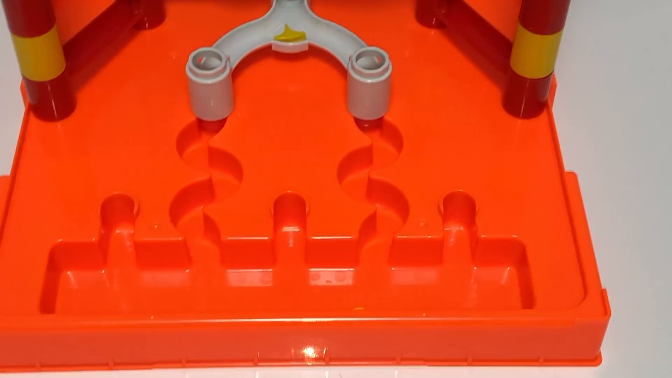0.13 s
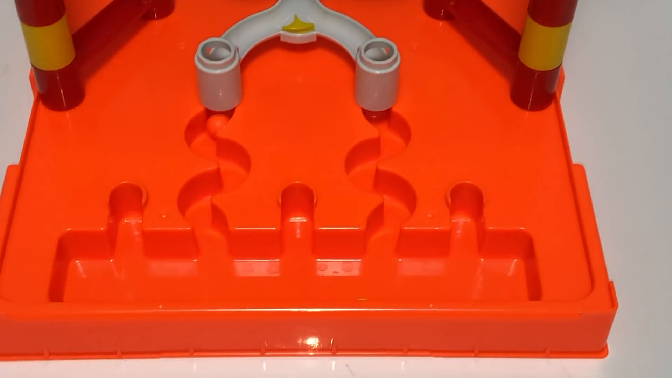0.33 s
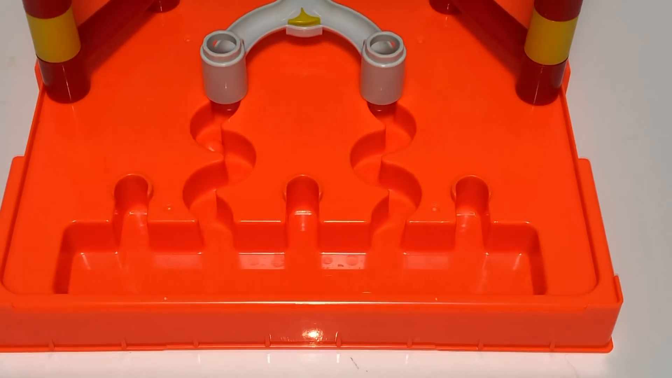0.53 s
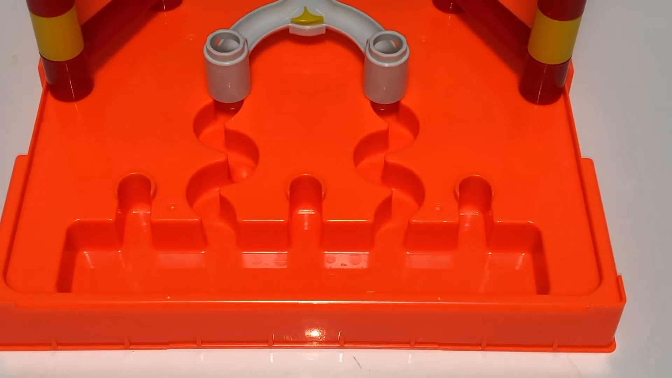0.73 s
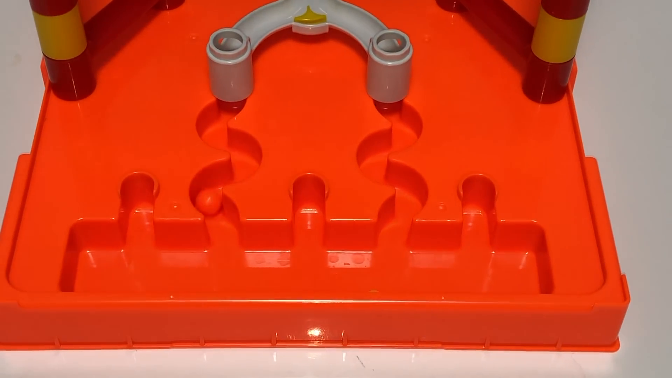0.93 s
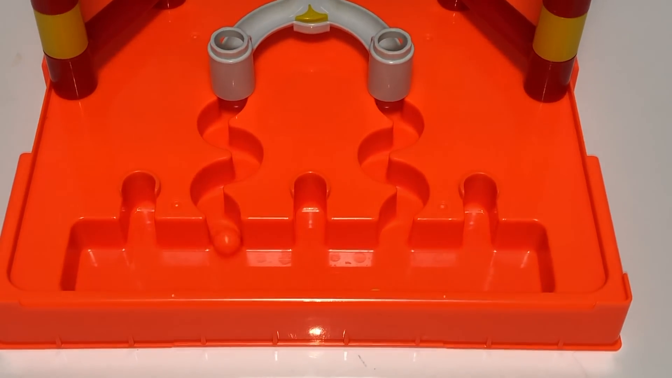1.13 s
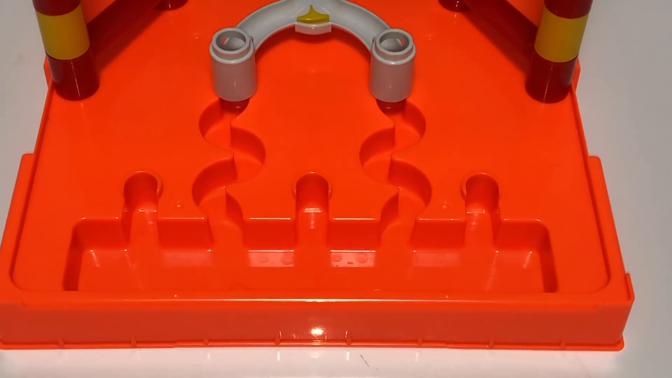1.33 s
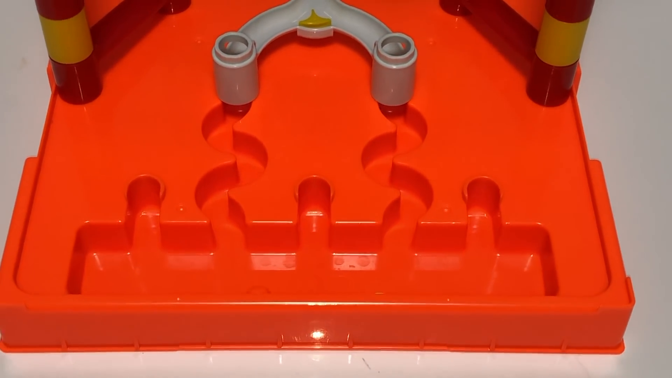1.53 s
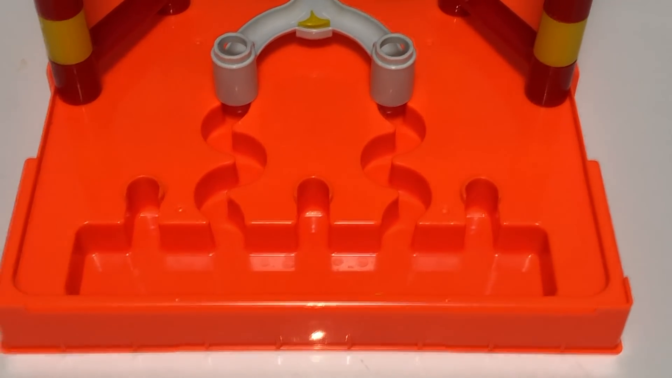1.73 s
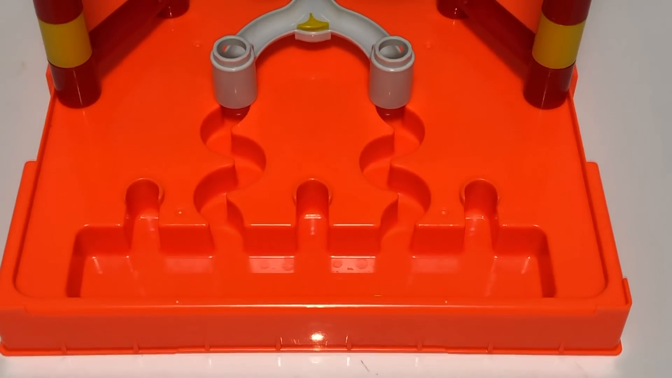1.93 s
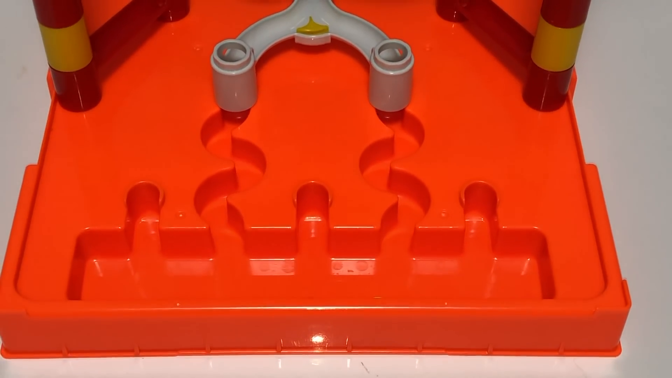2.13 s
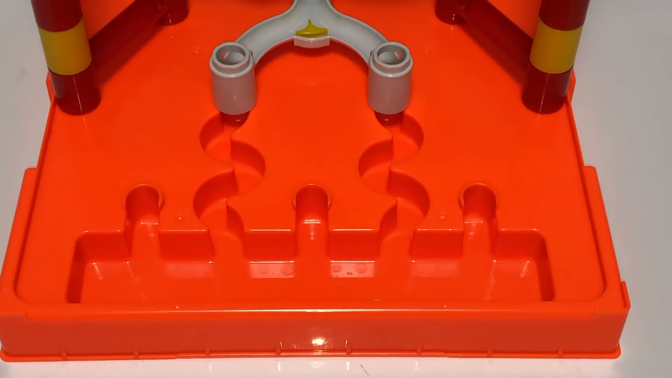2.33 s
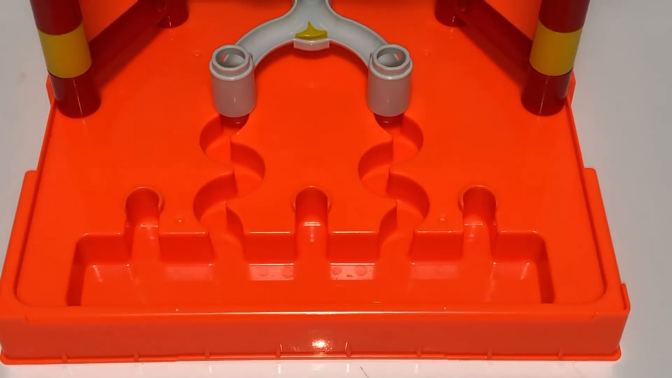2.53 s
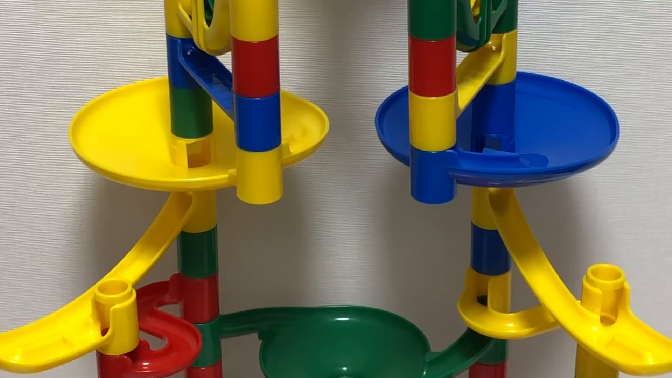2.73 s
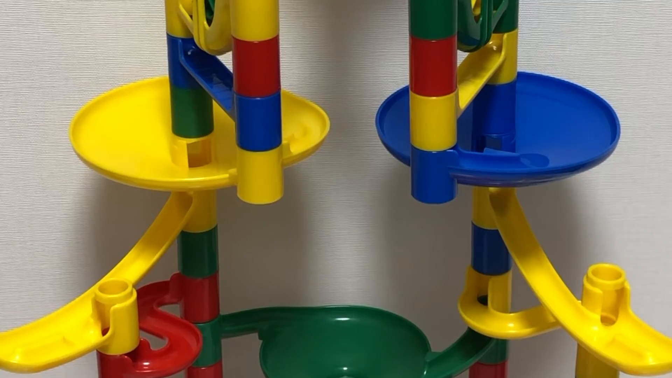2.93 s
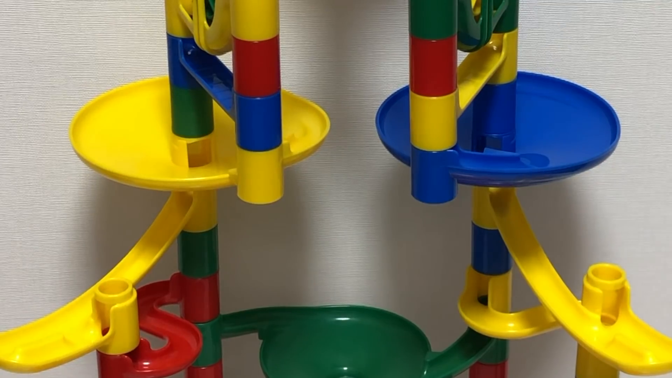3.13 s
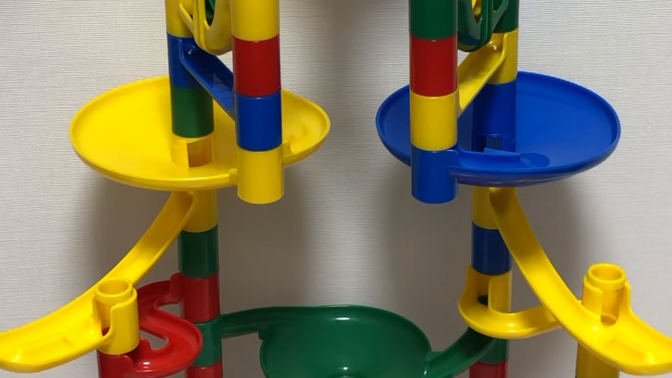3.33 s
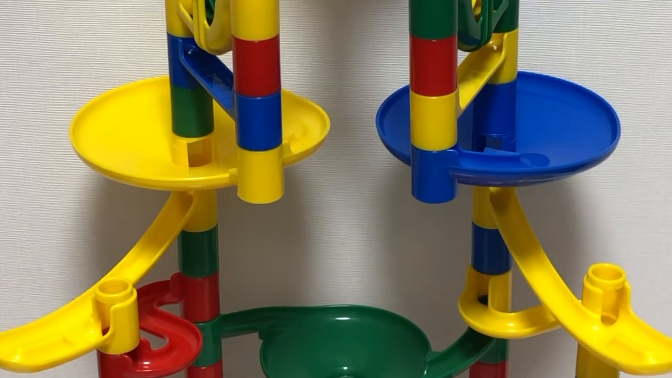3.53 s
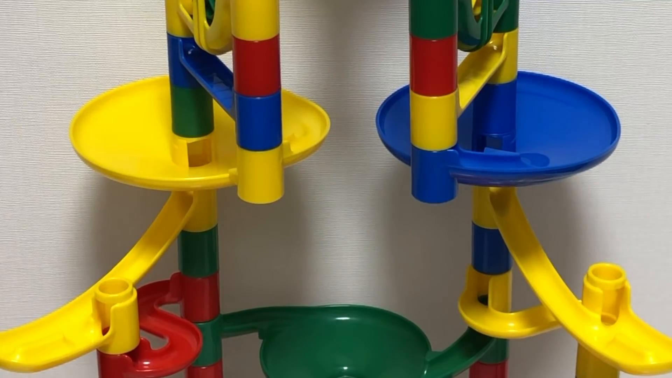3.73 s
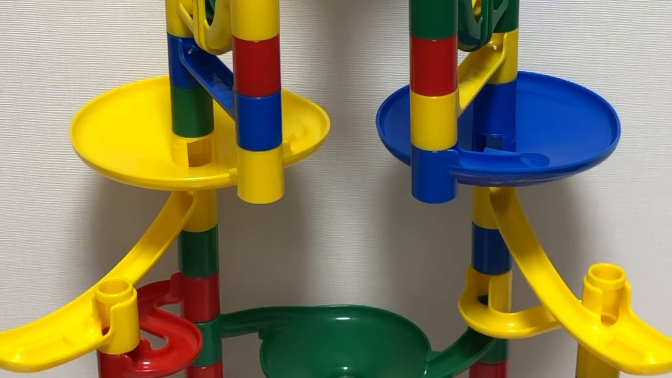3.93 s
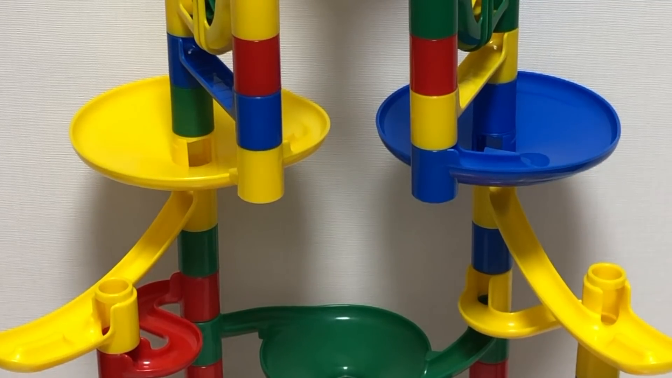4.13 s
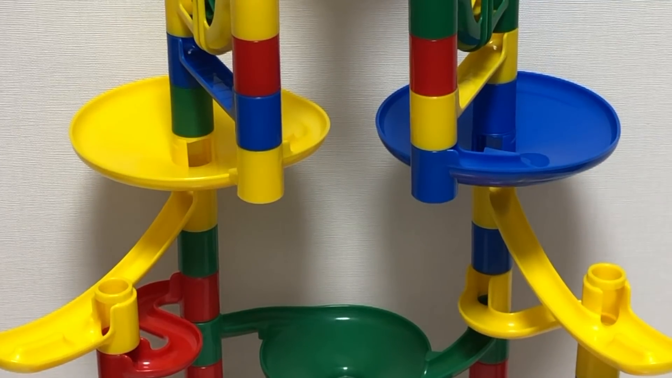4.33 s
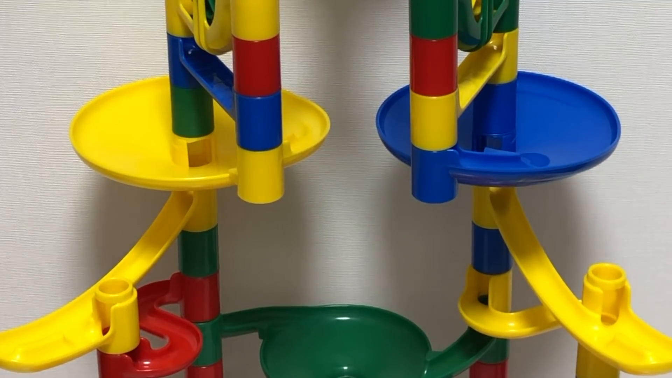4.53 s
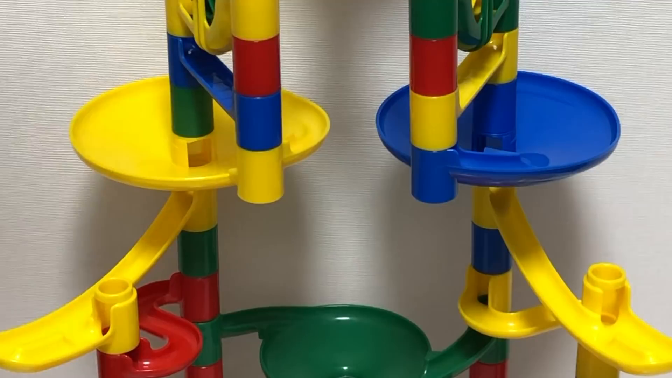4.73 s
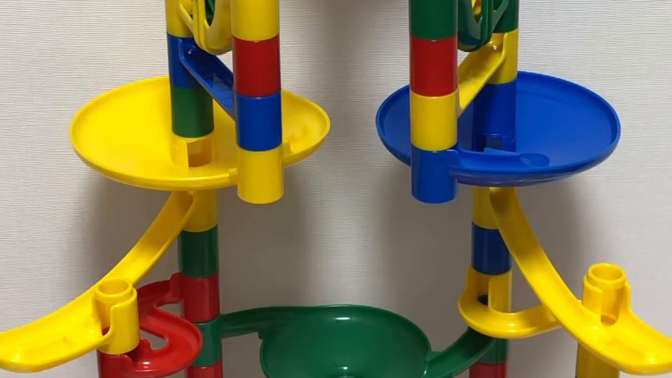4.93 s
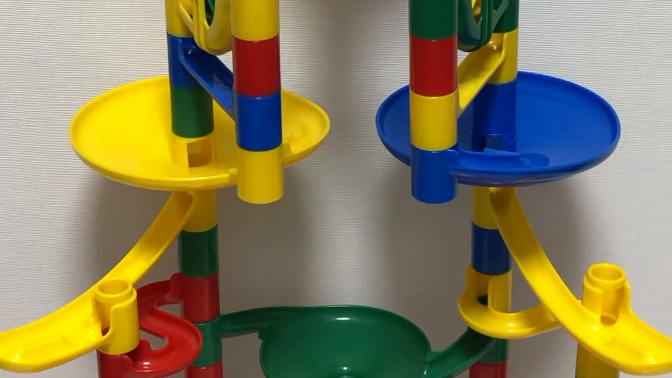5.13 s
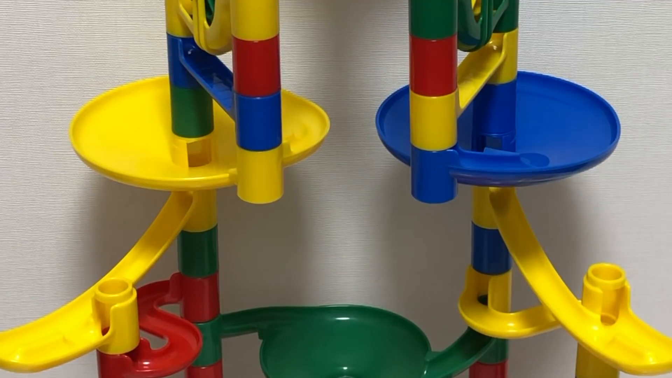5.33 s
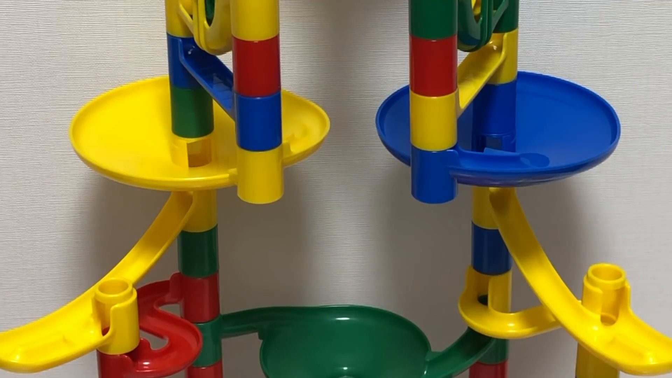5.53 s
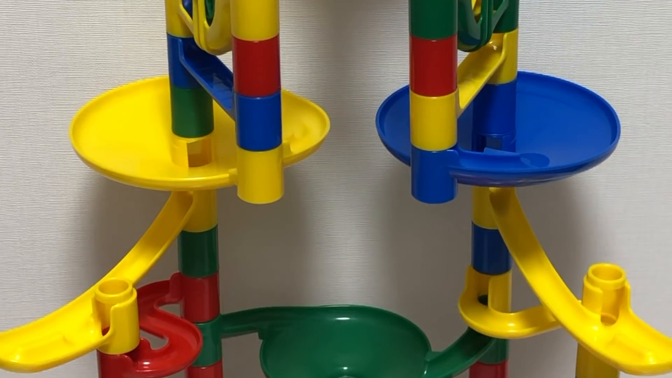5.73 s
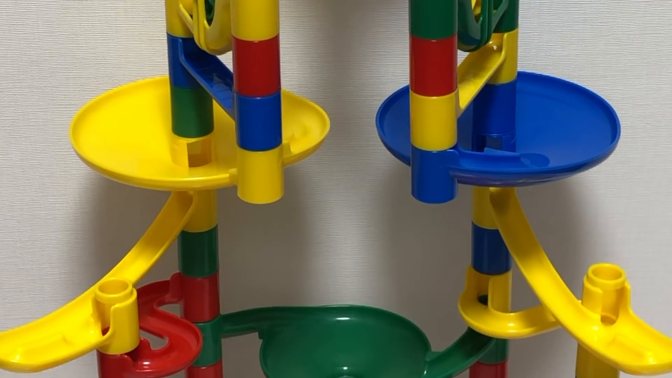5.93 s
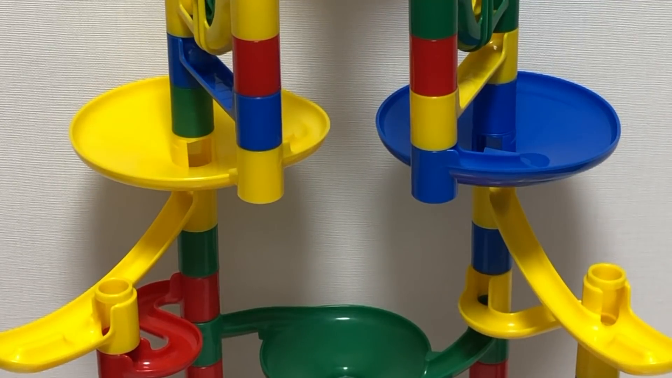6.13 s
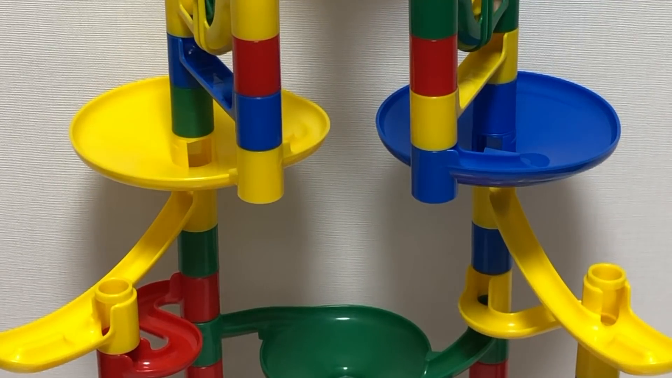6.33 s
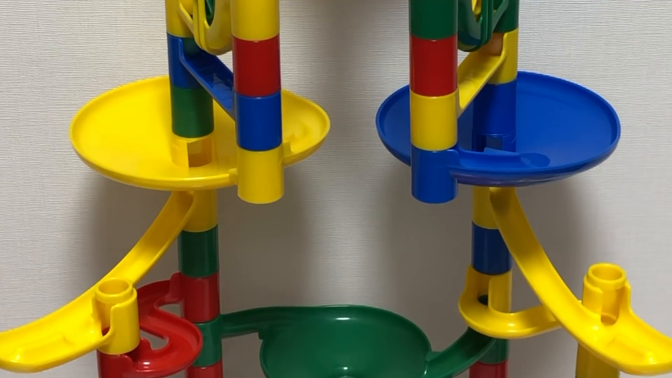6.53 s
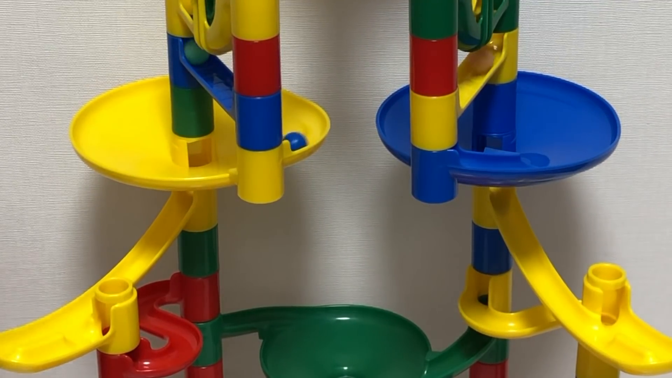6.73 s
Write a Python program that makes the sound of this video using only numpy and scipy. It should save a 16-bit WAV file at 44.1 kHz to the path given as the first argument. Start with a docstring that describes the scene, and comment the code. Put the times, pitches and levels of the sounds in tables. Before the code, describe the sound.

Close recording in a quiet indoor room with light hiss and short echoes. First, one ball raps quickly on hollow plastic, trickles down a groove, gives one strong clack and a bounce, then fades. Later, brighter, ringing knocks and gritty rolling come from a toy marble tower, sparse at first, then almost continuous, with low thumps shaking the structure.

```python
"""Marble run: a tray, then a tower

Small hard balls run through plastic toys in a quiet room. First one ball drops into a wide hollow tray close by,
zigzags down its groove and comes to rest. Then the scene changes: balls drop one after another into a tower of
tubes, ramps and bowls a little farther off. Each knock is a noisy crack plus ringing plastic; rolling is a dense
train of tiny blows into the same resonances. Room echoes and a faint hiss surround it all."""
import sys
import numpy as np
from scipy import signal
from scipy.fft import rfft, irfft
from scipy.io import wavfile
from scipy.ndimage import uniform_filter1d

SR = 44100
rng = np.random.default_rng(int(sys.argv[2]) if len(sys.argv) > 2 else 0)


def generate_wav(signal):
    """Clip the signal to [-1, 1] and save it as 16-bit WAV at the path in sys.argv[1]."""
    frames = np.transpose(np.atleast_2d(signal))
    scaled = np.clip(frames, -1, 1) * 32767
    pcm = np.round(scaled).astype(np.int16)
    wavfile.write(sys.argv[1], SR, pcm)


N = 303408
SCENE_CHANGE_S = 2.66  # the tray stops here and the quiet of the room changes


def gain_of(db):
    """Turns decibels into an amplitude factor."""
    return 10 ** (np.asarray(db) / 20)


def evened(x):
    """Scales the last axis to an rms of 1."""
    return x / np.sqrt(np.mean(x ** 2, -1, keepdims=True) + 1e-20)


def read(points, hz):
    """Reads a (frequency, value) table on a log-frequency axis."""
    point_hz, value = np.transpose(points)
    return np.interp(np.log(hz + 1), np.log(point_hz + 1), value)


def octaves(hz):
    """Counts octaves above 2 kHz, for tilting a spectrum; everything below 500 Hz counts as 500 Hz."""
    return np.log2(np.maximum(hz, 500) / 2000)


def shaped(x, gain):
    """Filters short overlapping slices of sound by gain(hz, s), so the colour can change with time."""
    hz, s, z = signal.stft(x, SR, nperseg=512, noverlap=384)
    filtered = signal.istft(z * gain(hz[:, None], s), SR, nperseg=512, noverlap=384)[1]
    return filtered[..., :x.shape[-1]]


def room(x, onset_s):
    """Sparse reflections of random sign build up, then each band dies at its own speed; one tail per row of x."""
    # How long each band takes to fall by 60 dB: hz [Hz], t60_s [s]
    decay_times = [(100, 0.34), (300, 0.17), (800, 0.23), (2000, 0.34), (5000, 0.28), (10000, .3),
                   (16000, .25)]
    taps = np.zeros((len(x), SR))
    # one reflection at a random spot in every 20 samples
    at = np.arange(150, SR - 20, 20) + rng.integers(0, 20, (len(x), (SR - 151) // 20))
    np.put_along_axis(taps, at, rng.choice([-1., 1.], at.shape), 1)
    tail = shaped(taps, lambda hz, s: gain_of(-60 * s / read(decay_times, hz)))
    tail *= 1 - np.exp(-np.arange(SR) / SR / onset_s)
    tail /= np.linalg.norm(tail, axis=1, keepdims=True)
    return signal.fftconvolve(x, tail, axes=1)[:, :N].sum(0)


def struck(rows, sounds):
    """Lays one sound at the time of each row, taking turns among four places."""
    places = np.zeros((4, N + sounds.shape[1]))
    for k, (row, hit) in enumerate(zip(rows, sounds)):
        start = round(row[0] * SR)
        places[k % 4, start:start + len(hit)] += hit
    return places[:, :N]


def air():
    """The quiet of the room and the microphone's hiss: coloured noise, a little different in each scene."""
    # Colour of the quiet, one list for the tray scene and one for the tower scene: hz [Hz], gain_db [dB]
    colours = [
        [(12, -60), (20, -33.5), (86, -2), (147, -10), (273, -14), (314, -17), (599, -19.5), (729, -22),
         (2310, -35), (15200, -41), (16500, -57.5)],
        [(12, -53), (20, -31), (65, -23), (86, 3), (117, 0), (151, 3), (265, -7.5), (314, -7.5), (1020, -23.5),
         (15200, -36), (16500, -53)],
    ]
    # Loudness of the quiet in the same two scenes: level_db [dB]
    levels = [-69.5, -69]
    bins = np.fft.rfftfreq(N, 1 / SR)
    quiets = []
    for colour, level_db in zip(colours, levels):
        noise = rng.standard_normal(N)
        coloured = irfft(rfft(noise) * gain_of(read(colour, bins)), N)
        quiets.append(gain_of(level_db) * evened(coloured))
    return np.where(np.arange(N) < SCENE_CHANGE_S * SR, quiets[0], quiets[1])


def rolling(rows, skitters, effort, modes, body, bumps_per_s, spread_db, modes_db, wall_width_hz, room_db):
    """Seams and dust under the ball give a dense train of tiny blows into the modes and the wall being crossed."""
    s, level_db, wall_hz, wall_db = np.transpose(rows)
    t = np.arange(N) / SR
    steady = gain_of(np.interp(t, s, level_db))
    power = steady ** 2
    for start_s, start_db, fade in skitters:
        since = np.maximum(t - start_s, 0)
        power += gain_of(2 * (start_db - fade * since)) * (t >= start_s)

    # brightness lies between that of steady rolling and of skittering, and follows the level
    steady_tilt, skitter_tilt, tilt_per_db = effort
    tilt_db = skitter_tilt + (steady_tilt - skitter_tilt) * steady ** 2 / power
    tilt_db += tilt_per_db * (10 * np.log10(power) + 50)

    bumps = rng.standard_normal(N) * (rng.random(N) < bumps_per_s / SR)
    bumps *= gain_of(spread_db * np.minimum(rng.exponential(1, N), 4))  # some bumps are far bigger

    bins, z = np.fft.rfftfreq(N, 1 / SR), rfft(bumps)
    ring = 0
    for k, (hz, width, db) in enumerate(modes):
        ring = ring + (-1) ** k * gain_of(db) * width / (width + 2j * (bins - hz))
    hum = gain_of(modes_db) * evened(irfft(z * ring, N))
    hum += evened(irfft(z * gain_of(read(body, bins)), N))
    hum = shaped(evened(hum), lambda hz, at: gain_of(np.interp(at, t, tilt_db) * octaves(hz)))

    # a resonance whose pitch follows the ball
    turn = np.exp(2j * np.pi * np.cumsum(np.interp(t, s, wall_hz)) / SR)
    r = np.exp(-np.pi * wall_width_hz / SR)
    wall = (turn * signal.lfilter([1], [1, -2 * r, r * r], bumps / turn)).real

    hum = hum * np.sqrt(power) + steady * gain_of(np.interp(t, s, wall_db)) * evened(wall)
    hum *= (t >= s[0]) * (t <= s[-1])
    return hum + gain_of(room_db) * room(hum[None], onset_s=0.0051)


def knocks(rows, modes, body, crack_s, crack_db, tick_db, scatter_db, wall_cycles, room_db, onset_s):
    """Each knock: a short crack, the modes in shares that depend on the spot struck, and the ring of the wall."""
    s, peak_db, wall_hz, wall_db, tilt_db = np.transpose(rows)[:, :, None]
    hz, width, db = np.transpose(modes)
    t = np.arange(16384) / SR
    draws = rng.standard_normal((len(rows), len(t) + len(hz) + 40))
    noise, spot, lumps = np.split(draws, [len(t), len(t) + len(hz)], axis=1)

    share = gain_of(db + tilt_db * octaves(hz) + scatter_db * spot)
    fading = np.sqrt(width[:, None]) * np.exp(-np.pi * width[:, None] * t)
    ring = share @ (fading * np.sin(2 * np.pi * hz[:, None] * t))

    # every spot has its own uneven treble
    bins = np.fft.rfftfreq(len(t), 1 / SR)
    lumps = np.repeat(lumps, 205, axis=1)[:, :len(bins)] * (bins > 1500)
    uneven_db = .65 * scatter_db * uniform_filter1d(lumps, 120, axis=1)
    colour_db = read(body, bins) + tilt_db * octaves(bins) + uneven_db
    crack = irfft(rfft(noise) * gain_of(colour_db))
    crack *= np.exp(-t / crack_s) + 0.033 * np.exp(-t / (4 * crack_s))

    tick = np.diff(noise, prepend=0) * np.exp(-t / 0.0016)  # first touch of the hard ball
    sound = evened(ring) + gain_of(crack_db) * evened(crack)
    sound += gain_of(tick_db + 2.6 * tilt_db) * evened(tick)

    # the wall swells, then dies; growth (dB per octave) changes how many cycles a higher wall lasts
    rise, cycles, growth = wall_cycles
    turns = wall_hz * t
    dying = np.exp(-turns / cycles / gain_of(growth * octaves(wall_hz)))
    swelling = (1 - np.exp(-turns / rise)) ** 2
    sound += gain_of(wall_db) * evened(np.sin(2 * np.pi * turns) * dying * swelling)

    sound *= 1 - np.exp(-t / 0.00074)  # the contact takes a moment to build
    sound *= gain_of(peak_db) / abs(sound).max(1, keepdims=True)
    places = struck(rows, sound)
    return places.sum(0) + gain_of(room_db) * room(places, onset_s)  # each place has its own echoes


def shakes(rows, thud_hz, width_hz):
    """The whole toy swings at one low note and dies out; a larger width means a faster death."""
    t = np.arange(16384) / SR
    swing = np.sin(2 * np.pi * thud_hz * t) * np.exp(-np.pi * width_hz * t)
    swing *= 1 - np.exp(-t / 0.063)
    strength = gain_of(np.transpose(rows)[1])[:, None]
    return struck(rows, strength * swing).sum(0)


def tray():
    """One ball in the hollow tray: rolling, knocks, and a shake of the light plastic at every knock."""
    # Rolling: start_s [s], level_db before tilting [dB], wall pitch_hz under the ball [Hz], wall ring_db [dB]
    roll = [(0, -49, 1070, -7), (.134, -54.5, 1200, -4.5), (.22, -38, 1150, -14.5), (.47, -50.5, 1150, -1),
            (.64, -61.5, 1085, -30), (.788, -57, 890, -15), (.87, -63, 890, -5.5), (1.018, -56.5, 800, 0),
            (1.122, -60.5, 790, -1.5), (1.2, -56.5, 790, -2), (1.24, -56, 1090, -1.5),
            (1.33, -53.5, 1100, -4.5), (1.5, -68.5, 1067, -4), (1.8, -76, 1050, -10), (1.84, -72, 743, 2.5),
            (2.05, -80.5, 730, 4), (2.2, -85, 725, 14), (2.44, -92, 738, 2), (2.56, -89, 740, 15),
            (2.64, -98, 740, 4)]
    # Fast skitters after a drop, dying away: start_s [s], level_db before tilting [dB], fade [dB per s]
    skitters = [(.676, -52.5, 57), (.924, -52, 60), (1.117, -53.5, 72), (1.346, -33, 182),
                (1.619, -45, 137)]
    # Knocks: start_s [s], peak_db before echoes [dB], struck wall pitch_hz [Hz], wall share_db [dB],
    # hardness as tilt_db [dB per octave]
    hits = [(.089, -42, 1070, 9, -3.5), (.101, -31, 1160, -2, -3), (.137, -16, 3600, -2, 1.5),
            (.155, -18, 4070, -4.5, 3), (.174, -5.5, 1136, 3.5, 5.5), (.186, -11.5, 1150, 4, -6),
            (.201, -12.5, 1135, 0, 1), (.215, -21, 1190, -5.5, 5.5), (.245, -23.5, 1140, -9, 0),
            (.254, -33, 2400, -1, 7), (.269, -16.5, 1155, 4.5, 2), (.316, -16, 1123, 8, 5),
            (0.353, -22, 1150, 7, 3.5), (.385, -20.5, 1090, 1, -1.5), (.41, -24.5, 1150, 3, 2),
            (0.431, -30.5, 1140, 4, -2), (.447, -33, 1120, -3, -4), (.463, -36, 1140, 1, -4),
            (0.477, -51, 1160, 1, -11), (.489, -30, 2490, 1, 0), (.526, -52, 1056, -14, -5),
            (.675, -30.5, 3000, -11, 0), (.731, -33, 1900, -6, 0.5), (.788, -43, 1330, -8, -4.5),
            (.923, -34, 1105, -11, -2.5), (.983, -34, 760, -7, 0), (1.026, -36, 813, 4, -1),
            (1.048, -36.5, 810, 1, -2.5), (1.116, -31.5, 6400, 0, -1.8), (1.19, -45, 802, 20, 0),
            (1.331, -32.5, 1135, -6, -2), (1.345, -15.5, 2643, -1.5, 0), (1.353, -23, 1080, 5, -1),
            (1.62, -22, 2520, -1, -1), (1.73, -34.5, 1115, 3, -5.5), (1.766, -37, 1324, -6, -6),
            (2.099, -62, 740, 1, -5)]
    # Resonances of the plastic: pitch_hz [Hz], width_hz [Hz], level_db [dB]
    modes = [(374, 18, -14), (511, 95, -10.5), (678.7, 31, -8), (782, 35, -6), (890, 20, -5.5),
             (980, 74, -8.5), (1057, 25, 3), (1150, 38, 1), (1327, 88, -2), (1593, 78, -1),
             (1820, 320, -12.5), (2364, 150, -4.5), (3000, 140, -17.5), (3433, 120, -8), (4087, 110, -10.5),
             (5085, 41, -24.5), (7560, 150, -29.5), (8650, 92, -27)]
    # Broad colour of the many small resonances: hz [Hz], gain_db [dB]
    body = [(35, -74), (60, -34), (308, -18.5), (785, -19), (1170, -11.5), (1470, -14.5), (2190, -8.5),
            (4970, -21.5), (5460, -23.5), (6900, -23.5), (8710, -27.5), (14200, -39), (16000, -33)]
    # effort: tilt of steady rolling and of skittering at -50 dB [dB per octave], then change per dB of level
    sound = rolling(roll, skitters, effort=(-7, -3.2, .03), modes=modes, body=body, bumps_per_s=5000,
                    spread_db=1.7, modes_db=1.2, wall_width_hz=60, room_db=-5)
    sound += knocks(hits, modes, body, crack_s=0.0057, crack_db=2.7, tick_db=-16, scatter_db=1.4,
                    wall_cycles=(2.8, 4.2, .1), room_db=-6.0, onset_s=0.0053)
    # hard knocks shake the light tray far more: the shake grows 1.2 dB for each dB of knock
    jolts = [(row[0], 1.2 * row[1] - 31.5) for row in hits]
    return sound + shakes(jolts, thud_hz=210, width_hz=140)


def tower():
    """Balls falling through the tower: rolling, knocks, and heavy landings that shake the whole toy."""
    # Rolling: start_s [s], level_db before tilting [dB], wall pitch_hz under the ball [Hz], wall ring_db [dB]
    roll = [(3.54, -49.5, 1100, -22), (3.9, -54, 1086, -2.5), (4.0, -55, 1100, 2), (4.3, -77, 1100, -3),
            (4.38, -50.5, 1517, -5), (4.8, -65, 1540, -0.5), (5.03, -52, 1510, -3), (5.35, -54, 1570, 1.5),
            (5.47, -55.5, 1480, -21), (5.6, -37.5, 1500, -11), (5.78, -47.5, 1570, -11),
            (5.86, -43, 1634, 7.5), (6.05, -37.5, 1630, -16), (6.3, -59, 1670, 7), (6.5, -43, 1510, -1),
            (6.62, -37.5, 1630, -5.5), (6.88, -57.5, 1660, 4.5)]
    # Fast skitters after a drop, dying away: start_s [s], level_db before tilting [dB], fade [dB per s]
    skitters = [(3.54, -58, 90), (4.051, -34.5, 80), (4.449, -31.5, 110), (4.599, -42, 105),
                (5.051, -34, 60), (5.6, -55, 81), (5.841, -32, 99), (5.971, -37, 41.5), (6.332, -32.5, 119),
                (6.429, -32.5, 44.7), (6.588, -33, 94)]
    # Knocks: start_s [s], peak_db before echoes [dB], struck wall pitch_hz [Hz], wall share_db [dB],
    # hardness as tilt_db [dB per octave]
    hits = [(3.349, -53.5, 900, 5, 2), (3.54, -25, 3830, 1, 7.5), (3.544, -29.5, 2134, 8, -0.5),
            (3.593, -23, 3894, 17, 4), (3.601, -28.5, 3820, 8, -0.5), (3.622, -23.5, 7680, 0, 6),
            (3.63, -34.5, 1080, 7, -12), (3.682, -25.5, 1460, -15, 8), (3.691, -31.5, 8000, 11, 9),
            (3.698, -25.5, 5240, 6, 5.5), (3.752, -30, 5320, 5, 4), (3.765, -33.5, 8230, 6, 1),
            (3.909, -40.5, 4120, -10, 11), (3.923, -33, 1960, 6, 2), (4.012, -42, 2180, 12, 1),
            (4.029, -36, 1490, 4, -2), (4.048, -23, 3960, 4, 4), (4.058, -16, 1114, -6, 2.5),
            (4.083, -16, 2210, -5, -0.3), (4.096, -21, 3800, 3, 1), (4.107, -21, 1860, 1.5, -8.5),
            (4.337, -51, 1090, -1, 5), (4.362, -31.5, 3700, -9, 0), (4.405, -33, 2160, 3, -4),
            (4.432, -23.5, 3900, 10, -1.5), (4.447, -14.5, 8200, 5, 8.5), (4.452, -14.5, 1102, 0.5, 7),
            (4.464, -24, 4765, 5, -4), (4.583, -20, 2090, 0, -1.5), (4.603, -25.5, 4230, -9, -5.7),
            (4.639, -24, 2180, 6, -3.5), (4.859, -41.5, 1450, 5, -4), (4.915, -40, 1440, 20, 12),
            (4.923, -34.5, 6300, 2, -5), (5.012, -37, 2170, 8, -4), (5.041, -17.5, 4800, -2, -0.5),
            (5.054, -16, 3900, 1, 0), (5.067, -31, 3600, 15, 2), (5.098, -16.5, 2150, -1.5, -3),
            (5.144, -19, 2760, -15, .5), (5.194, -20, 4660, -3.5, -5.5), (5.244, -29, 1676, 6, 0),
            (5.299, -29.5, 4560, 6, 0.5), (5.357, -26.5, 3630, -12, 1.5), (5.49, -19, 4830, 1, -2),
            (5.502, -19.5, 3490, 5.5, -3.5), (5.52, -19, 1440, -3, 6), (5.543, -24.5, 1514, 10, -10),
            (5.599, -17.5, 2132, 0, 0), (5.681, -31, 4680, 11, 0), (5.714, -28, 4610, 2, -8),
            (5.778, -21.5, 3120, -2, -1), (5.799, -33, 3970, 7, 4), (5.822, -17.5, 1450, -3, -6),
            (5.83, -17, 2870, -0.5, -2), (5.843, -19, 2800, 6, 19), (5.851, -26, 880, 19, -1),
            (5.913, -23, 3010, 6, 4.5), (5.963, -17.5, 1500, -4, -3), (5.995, -19, 4600, -8, 5.5),
            (6.039, -23.5, 1480, 11, 3), (6.08, -24.5, 2960, 7, -1), (6.225, -35.5, 1690, 7, -3),
            (6.273, -33, 1580, 10, -4), (6.305, -18.5, 1400, 6, 8.5), (6.321, -18.5, 2850, -7, -3),
            (6.349, -22, 5040, -1, -5), (6.427, -19.5, 9350, 2, 13), (6.432, -20, 1450, 13.5, -5),
            (6.475, -17, 3170, 5, -2.5), (6.512, -32, 2800, -4, -4), (6.523, -17, 2900, -16, -2),
            (6.57, -13.5, 2910, 5, 10), (6.589, -15, 1325, -1.5, -4.9), (6.62, -22, 1410, 4, 1),
            (6.831, -30, 1400, 5, -8), (6.867, -31.5, 2780, 5, -4)]
    # Heavy landings: start_s [s], strength_db of the swing before its slow rise and decay [dB]
    landings = [(3.64, -33.5), (3.752, -42), (4.1, -31), (4.362, -37.5), (4.464, -31), (4.583, -32),
                (5.067, -31), (5.144, -26.5), (5.602, -32.5), (5.714, -45), (5.851, -37), (6.02, -37),
                (6.321, -56), (6.589, -33)]
    # Resonances of the plastic: pitch_hz [Hz], width_hz [Hz], level_db [dB]
    modes = [(316, 87, -11), (608, 6, -3.5), (647.6, 12.4, -6), (895, 42, -2.5), (991, 36, 0.5),
             (1118, 25, 3), (1230, 33, -34), (1461, 31, 7), (1642, 22, 4), (2025, 50, 0), (2773, 11, -2),
             (3200, 220, 5), (3670, 150, -34), (3500, 17, -12), (4474, 96, -2.5), (4520, 64, -3),
             (6570, 60, -15), (8220, 40, -13), (8900, 90, -17), (14600, 200, -23)]
    # Broad colour of the many small resonances: hz [Hz], gain_db [dB]
    body = [(100, -12), (170, -6), (218, -31), (312, -10), (503, -17), (656, -8), (735, -40), (872, -40),
            (1210, 0), (1490, 4), (1760, -1), (3630, 7), (16000, -13)]
    sound = rolling(roll, skitters, effort=(-6.5, -5.5, 0.077), modes=modes, body=body, bumps_per_s=8000,
                    spread_db=0.44, modes_db=0.2, wall_width_hz=133, room_db=-2)
    sound += knocks(hits, modes, body, crack_s=0.0053, crack_db=7.0, tick_db=-20.5, scatter_db=4.8,
                    wall_cycles=(1.1, 14, 4.1), room_db=0.62, onset_s=0.0017)
    return sound + shakes(landings, thud_hz=98.3, width_hz=8.5)


def scene():
    """Tray, then tower; the microphone drops the deep bass of the toys, and the quiet of the room is added."""
    toys = tray() * (np.arange(N) < SCENE_CHANGE_S * SR) + tower()
    bass_cut = signal.butter(5, 72, "high", fs=SR, output="sos")
    return (signal.sosfilt(bass_cut, toys) + air())[None]


def record(dry):
    """A long filter makes the top of the band weak, then cuts it off."""
    weak_hz, top_hz = 15850, 16950
    edges = [0, weak_hz, weak_hz + 100, top_hz, top_hz + 100, SR / 2]
    gains = [1, 1, gain_of(-25.5), gain_of(-27.0), 0, 0]
    taps = signal.firwin2(2047, edges, gains, window=("kaiser", 9), fs=SR)
    return signal.oaconvolve(dry, taps[None], "same")


dry = scene()
out = record(dry)
generate_wav(out)
```